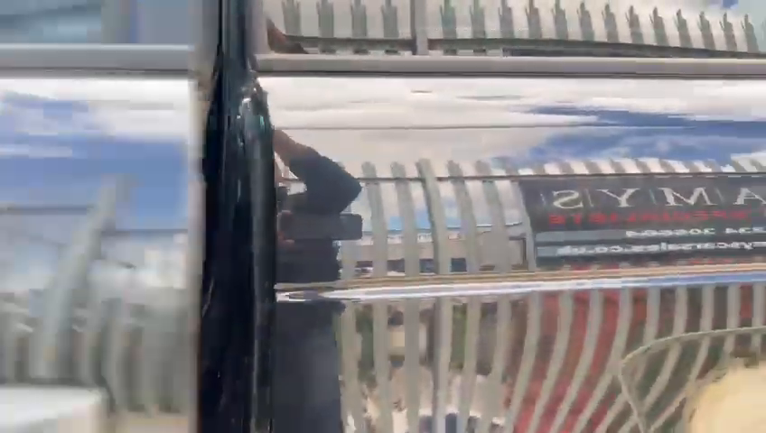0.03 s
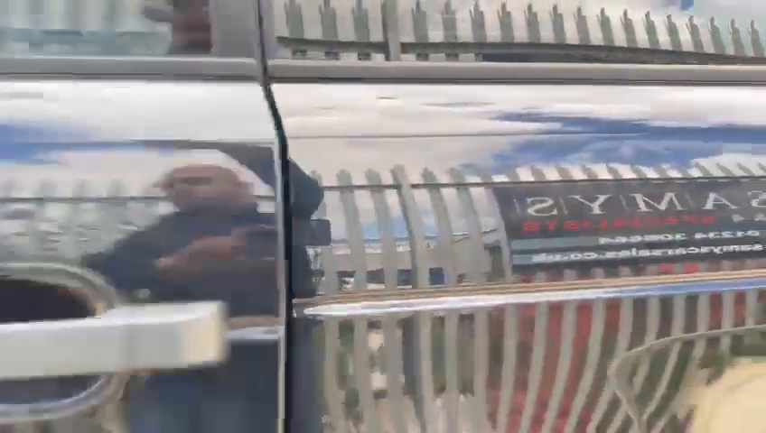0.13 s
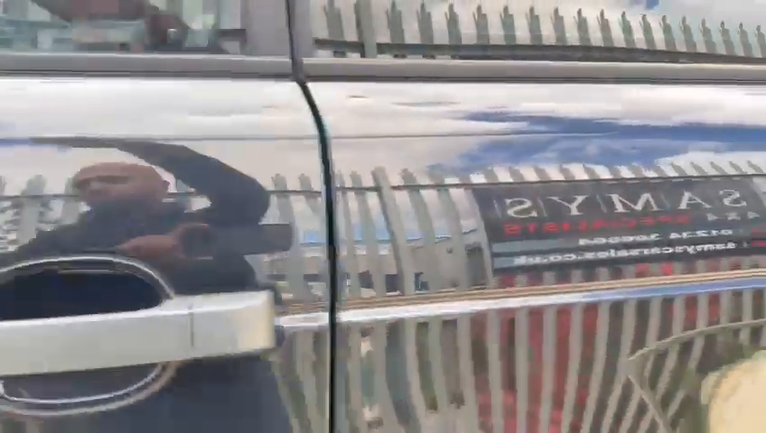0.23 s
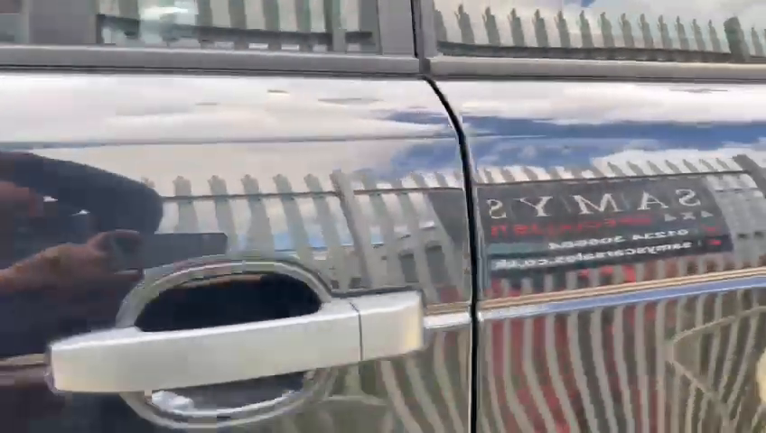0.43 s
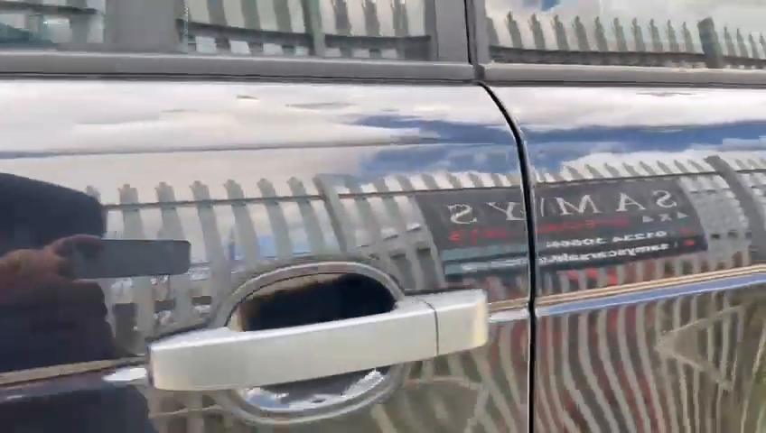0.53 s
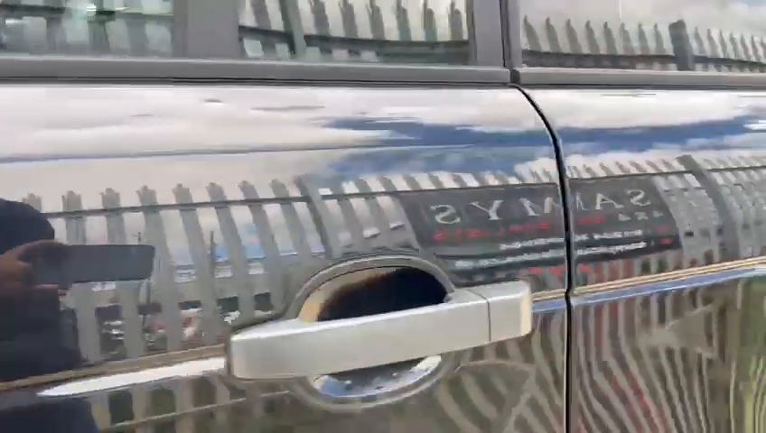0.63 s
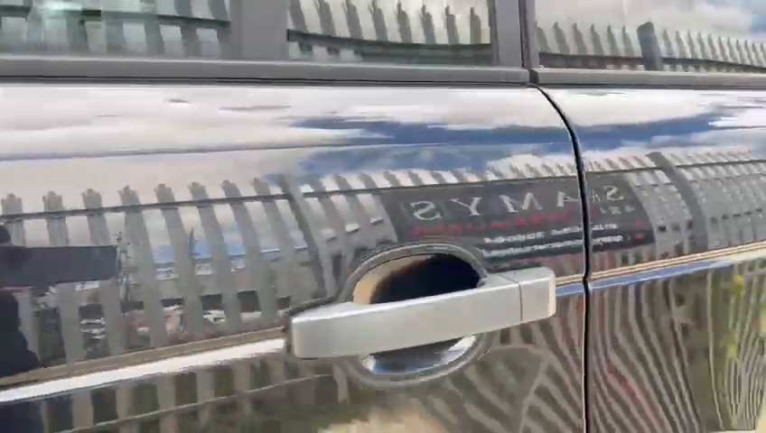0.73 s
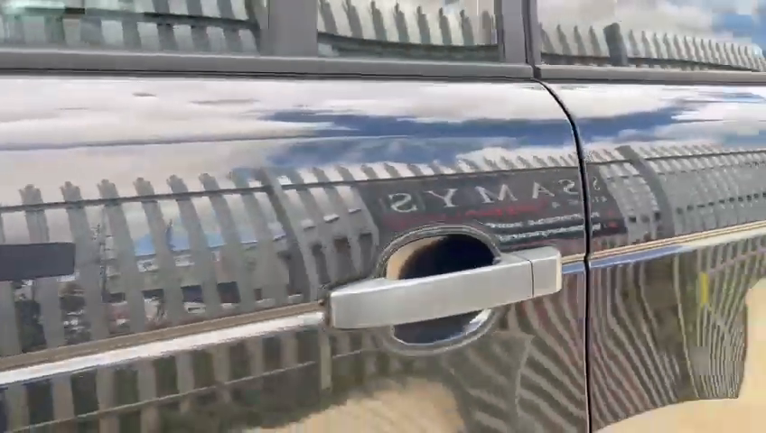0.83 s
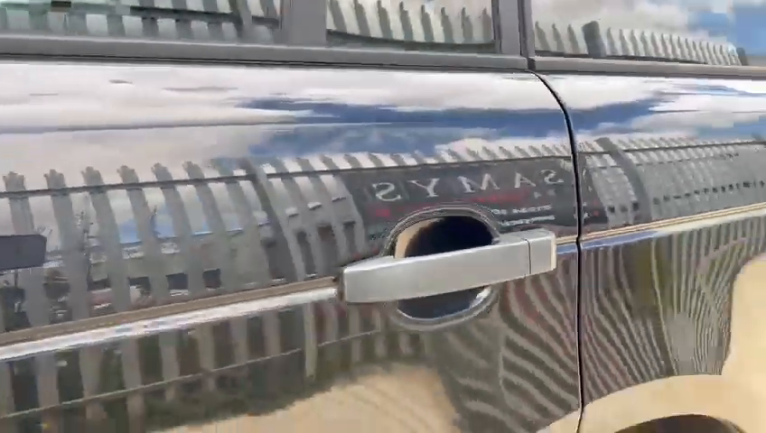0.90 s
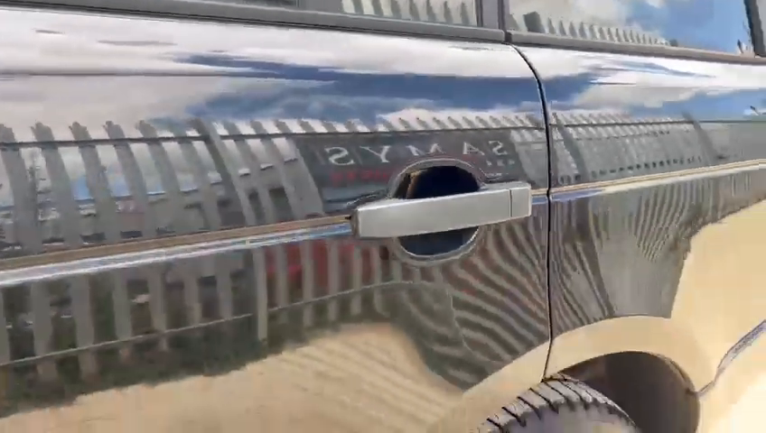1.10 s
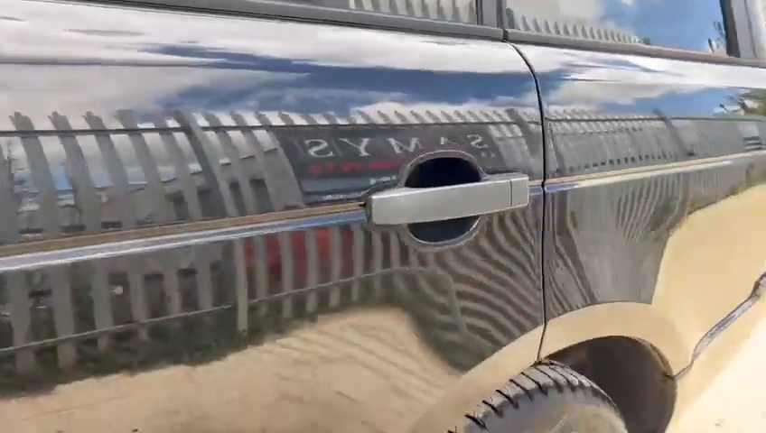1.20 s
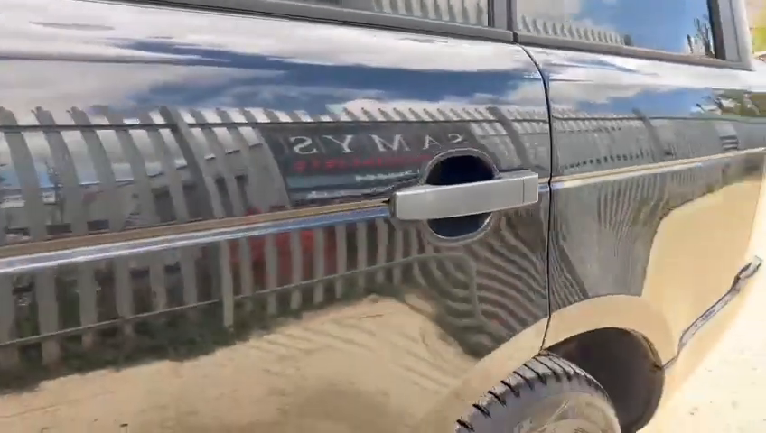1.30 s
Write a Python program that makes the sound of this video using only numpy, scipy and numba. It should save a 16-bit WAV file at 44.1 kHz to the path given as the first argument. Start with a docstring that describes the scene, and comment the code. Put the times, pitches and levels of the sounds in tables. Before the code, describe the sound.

Close phone pickup outdoors: over quiet low hum and air, a car door thunks shut with a tight double latch clack and brief shudder, followed by soft rumbling bumps and small crunches of grit underfoot.

```python
"""Heavy car door pushed shut outdoors

A phone an arm's length away hears a low hum of sines in coloured noise, then the door closing:
pushed modes thud, noise bursts and short metal rings make the latch, filtered noise shudders and scatters.
Dull modal bumps with a rumbling tail follow as the phone is carried back, with shoes scuffing on grit
(rough noise swells and single cracks). The recorder's gain ducks under the loud peaks."""
import sys
import numpy as np
from scipy import signal
from scipy.fft import rfft, irfft
from scipy.io import wavfile
from scipy.ndimage import uniform_filter1d, minimum_filter1d
from numba import njit

SR = 44100
rng = np.random.default_rng(int(sys.argv[2]) if len(sys.argv) > 2 else 0)


def dump(signal):
    """Clip the signal to [-1, 1] and save it as 16-bit WAV at the path in sys.argv[1]."""
    limited = np.clip(np.atleast_2d(signal).T, -1, 1)
    pcm = np.round(limited * 32767).astype(np.int16)
    wavfile.write(sys.argv[1], SR, pcm)


N = 59535

# contacts of latch and striker: start_s, relative_level_db, treble_tilt_db_per_octave, rise_s,
# crack_t60_s, relative_ring_db, left_minus_right_db
LATCH_CONTACTS = [(0.2054, -19.5, 2, .00035, 0.14, -34, 4.5), (0.2276, -1, -0.5, 0.00056, 0.025, -5, 7),
                  (0.229, -3, 0.7, 0.00032, 0.021, -12, 2), (0.2434, -9, 2, .0003, 0.0097, -12.5, 4.5),
                  (0.2444, -9.5, 1, .0012, 0.17, -12, 4.5), (0.2617, -3, 6, 0.0011, 0.072, -30, 3),
                  (0.2661, 0.5, -2, 0.0007, 0.041, -10.5, 4.5), (0.2805, -16, -4.5, .0005, 0.11, -16, 0)]


def undb(db):
    """Turn decibels into an amplitude gain."""
    return 10 ** (np.asarray(db) / 20)


def pan(db):
    """Left and right gains for a level difference; positive leans left."""
    return undb(np.array([[db], [-db]]) / 2)


def bin_frequencies():
    """Frequency in Hz of every bin of the spectrum."""
    return np.arange(N // 2 + 1) * SR / N


def curve(points):
    """Gain at every frequency, drawn through (hz, db) points on a log frequency axis."""
    hz, db = np.array(points, float).T
    log_hz = np.log(bin_frequencies() + 1e-9)
    return undb(np.interp(log_hz, np.log(hz), db))


def noise(points, tilt_db=0):
    """Coloured stereo noise of rms 1, tilted in dB per octave and widest around 1 kHz."""
    # stereo width of diffuse sound: frequency_hz, side_minus_mid_db
    width_points = [(60, -10), (300, -6.5), (1000, 0.5), (4000, -4), (9000, -8)]
    octaves = np.log2(np.maximum(bin_frequencies(), 100) / 2000)
    white = rfft(rng.standard_normal((2, N)))
    mid, side = white * curve(points) * undb(tilt_db * octaves)
    side = side * curve(width_points)
    stereo = irfft(np.array([mid + side, mid - side]), N)
    return stereo / stereo.std()


def fade(start, rise, t60):
    """Envelope with a straight rise and an exponential fall of 60 dB in t60; times in s."""
    t = np.arange(N) / SR - start
    attack = np.clip(t / rise, 0, 1)
    return attack * np.exp(-np.log(1000) * np.maximum(t - rise, 0) / t60)


def walk(count):
    """Random wander of straight lines through a number of points."""
    return np.interp(np.arange(N), np.linspace(0, N, count), rng.standard_normal(count))


def grain(depth_db):
    """Gain of rms 1 that jumps about every millisecond, as small contacts come and go."""
    jitter = uniform_filter1d(rng.standard_normal(N), size=50)
    gain = undb(depth_db * np.clip(jitter / jitter.std(), -2, 2))
    return gain / np.sqrt(np.mean(gain ** 2))


def ring(modes, start=0):
    """Decaying modes of a struck body; neighbours swing in opposite directions."""
    t = np.maximum(np.arange(N) / SR - start, 0)
    out = 0
    for k, (hz, db, t60) in enumerate(modes):
        decay = np.exp(-np.log(1000) * t / t60)
        out = out + (-1) ** k * undb(db) * np.sin(2 * np.pi * hz * t) * decay
    return out


def struck(blows, modes):
    """Smooth pushes excite the modes; a longer contact sounds duller."""
    t = np.arange(N) / SR
    force = 0
    for start, db, contact in blows:
        age = np.maximum(t - start, 0) / (contact / 2 / np.pi)
        push = age * np.exp(-age)
        force = force + undb(db) * push / push.sum()
    return signal.fftconvolve(force, ring(modes))[:N]


def machinery_hum():
    """Distant machinery: low sines, each wandering in pitch on its own."""
    # tones: frequency_hz, rms_level_db
    hum_tones = [(66, -40), (86, -44.5), (133, -47.5), (177, -50.5), (420, -55.5)]
    wander = 0.03047  # fraction of the frequency
    hum = 0
    for hz, db in hum_tones:
        drifting_hz = hz * (1 + wander * walk(count=24))
        cycles = rng.random() + np.cumsum(drifting_hz) / SR
        hum = hum + undb(db) * np.sqrt(2) * np.sin(2 * np.pi * cycles)
    return hum


def outdoor_air():
    """Outdoor noise, mostly low, whose midrange flutters and whose treble leans left."""
    # colour: frequency_hz, relative_level_db_per_hz
    air_colour = [(18, -24), (28, -3), (80, -2), (108, -1), (135, -6.5), (187, -10.5), (315, -10.5),
                  (385, -18.5), (425, -11), (649, -14.5), (853, -20.5), (1890, -27.5), (2360, -31.5),
                  (9500, -39.5), (12400, -115)]
    level_db, lean_left_db, top_hz, flutter_db = -38.5, 3.5, 9440, 1.5
    top_cut = signal.butter(12, top_hz, fs=SR, output="sos")
    air = signal.sosfilt(top_cut, noise(air_colour))
    # half-octave bands from 400 Hz up, each with its own wavering level
    for lo in 400 * np.sqrt(2) ** np.arange(6):
        band_pass = signal.butter(2, [lo, lo * np.sqrt(2)], "band", fs=SR, output="sos")
        band = signal.sosfiltfilt(band_pass, air)
        air = air + band * (undb(flutter_db * walk(count=28)) - 1)
    bass = signal.sosfiltfilt(signal.butter(1, 200, fs=SR, output="sos"), air)
    return undb(level_db) * (bass + pan(lean_left_db) * (air - bass))


def door_thud():
    """Blows of the door on its frame push the low modes of door skin and cabin."""
    # blows: start_s, relative_level_db, contact_s
    door_blows = [(.1868, -7, 0.02), (.2031, -16, 0.0059), (.2275, -13, 0.00052), (.2449, 10, 0.0099),
                  (.2464, -.5, 0.0098), (.2726, 3.5, 0.0094), (.2868, -2, 0.0065), (.3138, -13, 0.0046),
                  (.336, 3, 0.029)]
    # modes of skin and cabin: frequency_hz, relative_level_db, t60_s
    door_modes = [(41, -20, .35), (67, -8.5, .19), (104, -7, .16), (163, -2.5, .18), (211, -4, .1),
                  (253, -1.5, .18), (320, -1, .14), (395, -1.5, .09), (472, 0, .08), (575, -3, .075),
                  (622, -4, .075), (690, -8, .07)]
    return undb(-0.64) * struck(door_blows, door_modes)


def latch():
    """Each metal contact gives a chattering noise crack and a short modal ring."""
    # modes of latch and striker: frequency_hz, relative_level_db
    latch_modes = [(490, 0.5), (1109, -7), (1438, -2), (1577, -5), (1803, -25.5), (2030, -13), (2380, -1.5),
                   (2960, -2), (3600, -15.5), (5630, -19.5)]
    # colour of a crack: frequency_hz, relative_level_db_per_hz
    crack_colour = [(200, -16), (500, 3), (900, -0.5), (1500, 2), (3100, -6.5), (3900, -11.5),
                    (5800, -15.5), (7500, -23.5), (9000, -18), (10200, -32.5), (11500, -30.5)]
    crack_db, metal_db, metal_t60_s, chatter_db = -14, -10, 0.037, 3
    modes = [(hz, mode_db, metal_t60_s) for hz, mode_db in latch_modes]
    out = 0
    for start, db, tilt_db, rise, t60, ring_db, pan_db in LATCH_CONTACTS:
        burst = noise(crack_colour, tilt_db) * fade(start, rise, t60)
        crack = undb(crack_db) * burst * grain(chatter_db)
        metal = undb(metal_db + ring_db) * ring(modes, start)
        out = out + undb(db) * pan(pan_db) * (crack + metal)
    return out


def trim_shudder():
    """Trim and glass shudder after the strike: a decaying burst of low-mid noise."""
    # colour: frequency_hz, relative_level_db_per_hz
    shudder_colour = [(90, -24), (170, 2), (290, 11), (500, 1.5), (700, -1), (1500, -23), (3000, -30),
                      (6000, -34.5)]
    strike_s = LATCH_CONTACTS[1][0]
    return undb(-12.5) * noise(shudder_colour) * fade(strike_s, rise=0.0038, t60=0.26)


def yard_scatter(direct):
    """Yard and fence scatter the sound back: convolution with a short fading noise."""
    # colour: frequency_hz, relative_level_db_per_hz
    yard_colour = [(60, 7), (250, 1.5), (600, -19), (1500, -1), (4000, -22), (11000, -29)]
    echo = noise(yard_colour) * fade(start=0.0084, rise=0.005, t60=0.15)
    echo = echo / np.sqrt(np.sum(echo ** 2) / 2)  # mean channel energy of 1
    return undb(-24) * signal.fftconvolve(direct, echo, axes=1)[:, :N]


def door():
    """Thud, shuddering trim and latch, with their brief scatter from the yard."""
    lean_left_db = 2
    direct = pan(lean_left_db) * (door_thud() + trim_shudder()) + latch()
    return direct + yard_scatter(direct)


def bumps():
    """Soft pushes ring low modes; a little noise rumble trails each knock."""
    # dull bumps: start_s, relative_level_db, contact_s
    bump_blows = [(0.373, -5, 0.0028), (.402, -8.5, 0.0017), (0.4202, -2, 0.0012), (0.448, -8, .0018),
                  (.468, -5.5, 0.0015), (0.4769, 8, 0.0076), (0.4919, -1.5, .00039), (.534, -4, 0.003),
                  (.5524, -6, 0.0034), (.598, -5.5, .003), (0.6511, -2.5, 0.0073), (0.694, -5.5, 0.013),
                  (.725, -6, 0.0062), (0.7475, -11.5, 0.0018), (0.8161, -13, 0.0014), (.839, 1.5, 0.011),
                  (0.8809, -5, 0.0098), (0.9272, -8, 0.011), (1.313, -6.5, 0.011)]
    # modes: frequency_hz, relative_level_db, t60_s
    bump_modes = [(46, -4.5, .25), (69, 1.5, .11), (83, 2.5, .11), (124, 2, .13), (168, -.5, .13),
                  (230, 3, .08), (318, -3, .075), (420, -5, .06)]
    # colour of the loose rumble: frequency_hz, relative_level_db_per_hz
    rumble_colour = [(25, -29.5), (70, 7.5), (150, -6), (300, -13), (500, -21), (900, -37), (2000, -79)]
    knock_db, rumble_db, rumble_t60_s, lean_left_db = -18, -25.5, 0.2, 2.6
    power = 0
    for start, db, contact in bump_blows:
        power = power + (undb(db) * fade(start, contact, rumble_t60_s)) ** 2
    knocks = undb(knock_db) * struck(bump_blows, bump_modes)
    rumble = undb(rumble_db) * np.sqrt(power) * noise(rumble_colour)
    return pan(lean_left_db) * (knocks + rumble)


def shoes():
    """Shoes on grit: swells of rough noise for the scuffs, short bursts for single grains."""
    # scuffs: start_s, level_db, rise_s, t60_s
    scuff_swells = [(.445, -46, 0.031, 0.15), (0.626, -53, 0.039, 0.043), (0.876, -43.5, 0.02, 0.22),
                    (0.916, -49.5, .006, 0.59), (1.06, -52.5, 0.063, 0.43)]
    # cracking grains: start_s, level_db, t60_s, treble_tilt_db_per_octave
    grit_cracks = [(0.43, -44, 0.018, -0.5), (.4467, -37, .016, 0.5), (0.591, -46.5, 0.0094, 0),
                   (0.646, -42, 0.018, -11), (0.9004, -33, 0.016, 1), (0.924, -38, 0.025, -3),
                   (1.0708, -36, 0.018, -0.5), (1.2115, -38.5, 0.01, -4), (1.2629, -32.5, 0.011, 24.5)]
    # colour of both: frequency_hz, relative_level_db_per_hz
    grit_colour = [(400, -36), (1200, -0.5), (2400, 4), (3500, -2), (6500, -2), (9000, 3.5), (9900, -20),
                   (12000, -28)]
    rough_db, lean_left_db = 4.5, 3.5
    swell = sum(undb(db) * fade(start, rise, t60) for start, db, rise, t60 in scuff_swells)
    scuffs = noise(grit_colour) * swell * grain(rough_db)
    cracks = 0
    for start, db, t60, tilt_db in grit_cracks:
        envelope = undb(db) * fade(start, 0.0016, t60)
        cracks = cracks + envelope * noise(grit_colour, tilt_db)
    return pan(lean_left_db) * (scuffs + cracks)


def scene():
    """Door, bumps and shoes over the background; the right microphone hears them a hair later."""
    lag_samples = 1
    left, right = machinery_hum() + outdoor_air() + door() + bumps() + shoes()
    return np.array([left, np.pad(right, (lag_samples, 0))[:N]])


@njit
def limiter_gain(peak, ceiling, hold, release):
    """Gain that drops at once on a peak, waits, then recovers; hold and release in samples."""
    out, gain, wait = np.ones(len(peak)), 1., 0.
    for i in range(len(peak)):
        wait -= 1
        if peak[i] * gain > ceiling:
            gain, wait = ceiling / peak[i], hold
        elif wait < 0:
            gain += (1 - gain) * gain / release
        out[i] = gain
    return out


def record(dry):
    """The phone drops the deepest bass, its limiter ducks both channels, and the top is cut."""
    low_cut_hz, top_hz = 6.4, 11700
    ceiling, hold_s, release_s = 0.99, 0.12, 0.01
    low_cut = signal.butter(2, low_cut_hz, "high", fs=SR, output="sos")
    x = signal.sosfilt(low_cut, dry)
    peak = np.abs(x).max(axis=0)
    gain = limiter_gain(peak, ceiling, float(hold_s * SR), float(release_s * SR))
    # spread each dip over 2 ms, then round its edges
    gain = uniform_filter1d(minimum_filter1d(gain, size=89), size=89)
    top_cut = signal.ellip(12, .2, 90, top_hz, fs=SR, output="sos")
    return signal.sosfilt(top_cut, x * gain)


dry = scene()
out = record(dry)
dump(out)
```